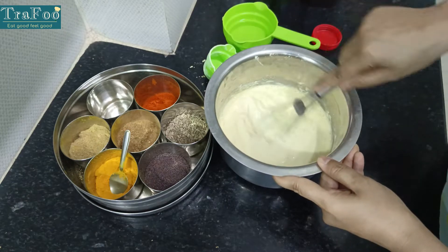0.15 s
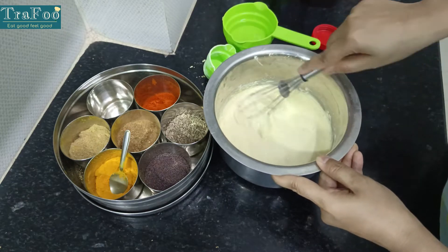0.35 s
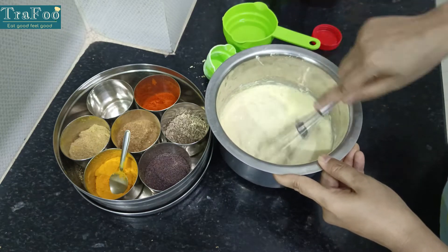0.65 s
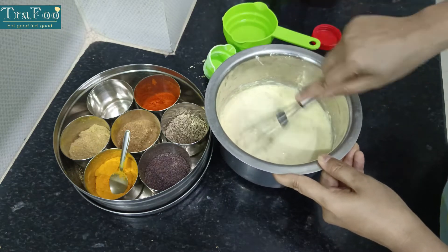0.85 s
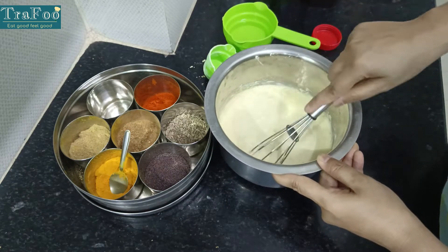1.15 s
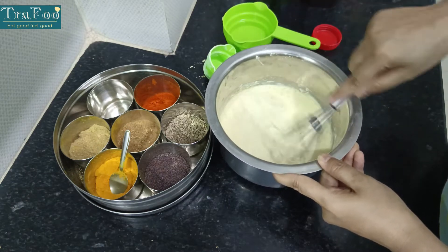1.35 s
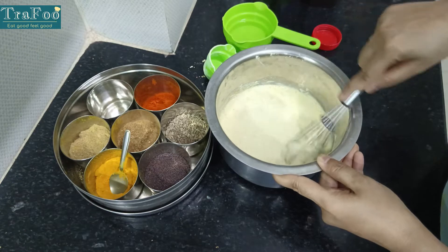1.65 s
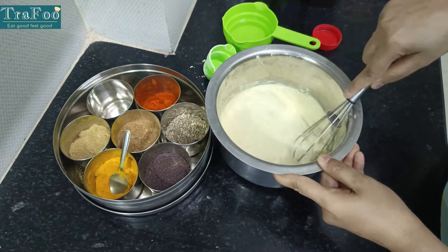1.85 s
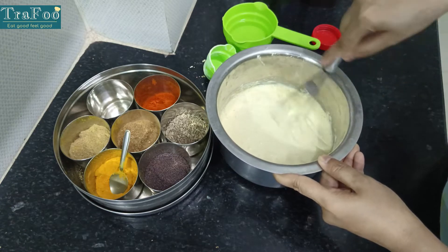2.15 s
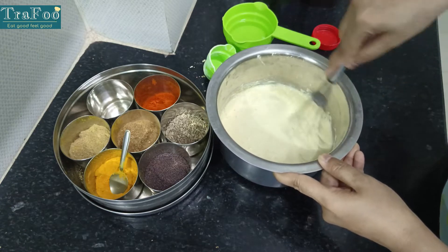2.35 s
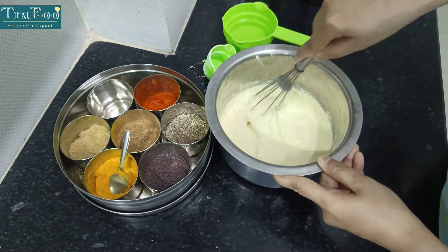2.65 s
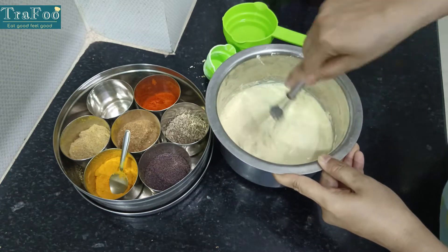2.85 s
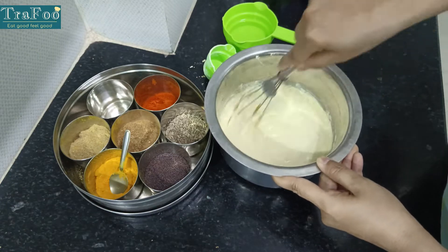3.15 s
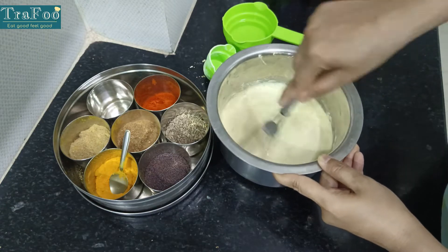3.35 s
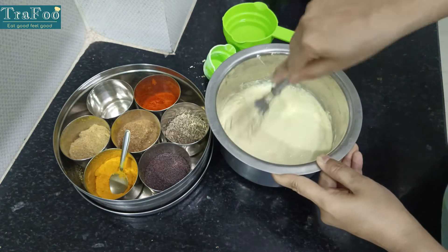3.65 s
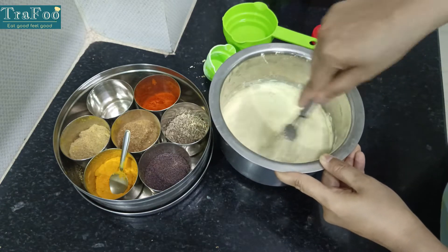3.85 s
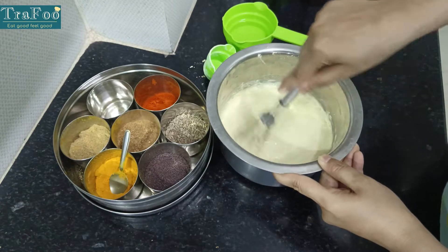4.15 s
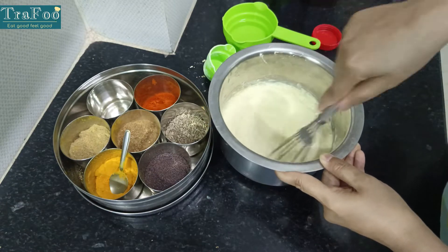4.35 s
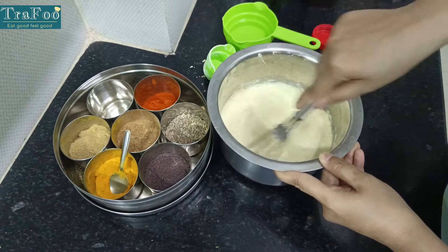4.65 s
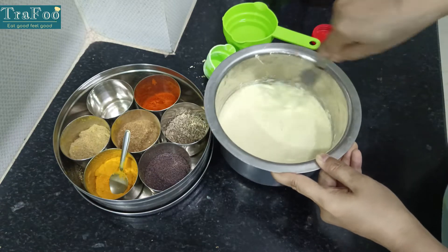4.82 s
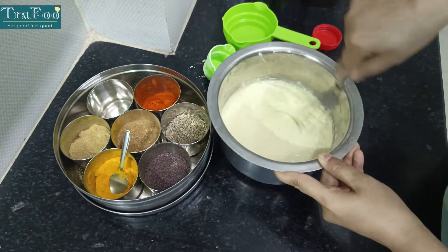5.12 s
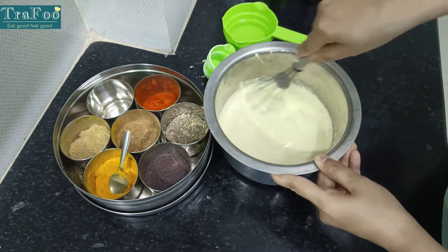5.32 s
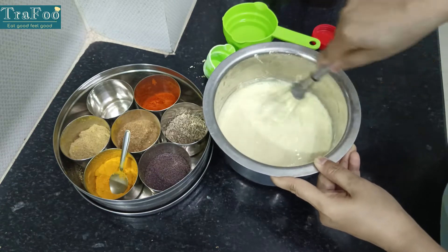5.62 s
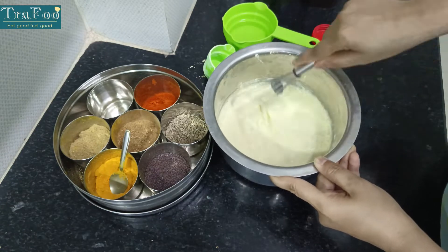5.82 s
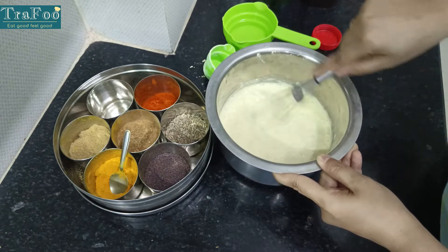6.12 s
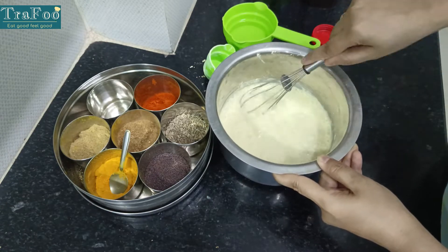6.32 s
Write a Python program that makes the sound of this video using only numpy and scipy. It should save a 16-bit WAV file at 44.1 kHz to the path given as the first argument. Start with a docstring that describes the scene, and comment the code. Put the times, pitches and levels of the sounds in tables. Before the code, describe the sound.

A wire whisk briskly beats batter in a steel bowl, wires scraping and clinking against the sides, with soft wet slops in a small kitchen.

```python
"""Whisk in a steel bowl

A wire whisk beats batter in a steel bowl on a stone counter, in a small hard-walled kitchen.
Wire slips, knocks and thuds strike decaying bowl modes; hard knocks leave the bare rim ringing.
Batter slops as short tones of rising pitch; jolts of noise make the counter hum low.
Two spaced microphones hear each mode out of step, with wall reflections and faint room tone."""
import sys
import numpy as np
from scipy import signal
from scipy.fft import rfft, irfft
from scipy.io import wavfile
from scipy.ndimage import uniform_filter1d

SR = 44100
rng = np.random.default_rng(int(sys.argv[2]) if len(sys.argv) > 2 else 0)


def waveform_to_disk(signal):
    """Save audio, clipped to [-1, 1], as 16-bit WAV at the path in sys.argv[1]."""
    frames = np.transpose(np.atleast_2d(signal))
    scaled = np.clip(frames, -1, 1) * 32767
    samples = np.round(scaled).astype(np.int16)
    wavfile.write(sys.argv[1], SR, samples)


N = 285768

# wires sweep the steel: hardest_press_s, level_db, swell_s, fade_s
STROKES = [(0.031, -39, 0.39, 0.052), (.14, -37.5, 0.088, 0.092), (.26, -40, 0.15, 0.074),
           (0.386, -33.5, 0.12, 0.075), (.5, -36.5, 0.057, 0.12), (.62, -37, 0.16, 0.085),
           (.75, -40.5, 0.12, 0.019), (.85, -32, 0.067, 0.044), (0.938, -33.5, 0.041, 0.038),
           (1.06, -36.5, 0.2, 0.12), (1.196, -39, 0.063, 0.039), (1.324, -37.5, 0.12, 0.055),
           (1.46, -43, 0.14, 0.02), (1.56, -36.5, 0.14, 0.089), (1.74, -38.5, 0.026, 0.14),
           (1.82, -37, 0.076, 0.01), (1.98, -43, 0.11, 0.085), (2.05, -35, 0.13, 0.022),
           (2.19, -39, 0.18, 0.15), (2.27, -38.5, 0.073, 0.02), (2.346, -38.5, 0.046, 0.02),
           (2.481, -35, 0.048, 0.082), (2.6, -41, 0.065, 0.15), (2.804, -31, 0.091, 0.09),
           (3.03, -36.5, 0.16, 0.26), (3.31, -34.5, 0.1, 0.068), (3.41, -41, 0.18, 0.26),
           (3.55, -40.5, 0.043, 0.34), (3.66, -47, 0.24, 0.036), (3.848, -35.5, 0.13, 0.14),
           (4.035, -40, 0.092, 0.17), (4.125, -35.5, 0.083, 0.06), (4.2, -40.5, 0.072, 0.032),
           (4.28, -39.5, 0.046, 0.18), (4.41, -35, 0.12, 0.093), (4.54, -40, 0.06, 0.17),
           (4.676, -36, 0.16, 0.066), (4.83, -37.5, 0.27, 0.3), (5.02, -44, .08, 0.043),
           (5.14, -39, 0.07, 0.26), (5.27, -40.5, 0.15, 0.059), (5.398, -41, 0.078, 0.022),
           (5.49, -36.5, 0.15, 0.11), (5.645, -38.5, 0.053, 0.11), (5.781, -37, 0.1, 0.064),
           (5.867, -34.5, 0.056, 0.11), (6.041, -36, 0.071, 0.007), (6.121, -35, 0.054, 0.094),
           (6.33, -38, 0.18, 0.1), (6.391, -35, 0.11, 0.054), (6.475, -35, 0.032, .05)]
# scrape while the hand turns; fall over one swell or fade length; its roundness (exponent)
TURN_DB, STROKE_DROP_DB, STROKE_ROUND = -72, 22.5, 1.3
SLIPS_PER_S = 3500
SKID_DB, SKID_S = -7, 0.0097   # loss of the skid into the batter; time constant of its power
# relative scrape spectrum: pitch_hz, density_db_per_hz
SCRAPE_SPECTRUM = [(300, -45), (1000, -50), (1200, -8), (1700, -5), (2600, -2.5), (3500, -1.5), (5000, 0.5),
                   (6200, -10), (8000, -13.5), (11000, -23), (16000, -45)]
# level of the lowest scrape, full below 1.2 kHz and gone by 1.5 kHz: time_s, level_db
LOW_SCRAPE = [(0, 6), (.25, -5), (.5, -5), (.7, -4), (.9, 5), (1.1, -2), (1.35, 3), (1.65, -6), (1.9, 4),
              (2.3, 7), (2.55, -7), (2.75, 11), (2.9, 4), (3.2, 8.5), (3.6, 12), (3.85, 8.5), (4.1, 6),
              (4.35, -4), (4.45, 7), (4.6, 0), (4.8, 9), (5.05, -1), (5.4, 10), (5.6, -8), (5.8, -13),
              (6.05, -1), (6.25, -9), (6.48, 10)]
# extra scrape tilt as the wires run deeper or shallower in the batter: time_s, tilt_db_per_octave
BRIGHTNESS = [(0, 0), (.2, 1), (.4, 1), (.6, 0.5), (.8, -1.5), (1.0, -1.5), (1.2, -1), (1.4, 0), (1.6, -1),
              (1.8, -1), (2.0, -1.5), (2.3, 1), (2.6, -0.5), (2.9, -1), (3.2, -1), (3.5, 0), (3.7, -1),
              (4.0, -2), (4.2, -1.5), (4.4, -2), (4.7, -0.5), (5.0, 2), (5.2, -2.5), (5.4, -1.5),
              (5.6, -1.5), (5.8, 0), (6.0, -0.5), (6.2, 0.5), (6.48, 0)]
# tilt per octave at a -36 dB press; a harder press sinks into the batter and dulls (dB/octave per dB)
BRIGHT_DB, DULLING = -2.5, 0.12
EDGE_FOLLOWS, EDGE_HZ = 0.29, 6100   # a harder press adds sizzle above this (dB per dB per octave)
AIR_FOLLOWS, AIR_HZ = 0.95, 9200   # the very top comes only with a firm press (dB per dB per octave)
WANDER_PER_S, NEIGHBOURS_ALIKE = 18.0, 0.45   # pace of the scraped spot; correlation of adjacent modes
# single wires flick the steel: mean rate, level over the scrape, width of the modes each one reaches
TICKS_PER_S, TICK_DB, TICK_WIDTH_OCT = 45, -14, 0.14
# three wires sing on the steel: boost, width, and scale of their random pitch drift
STREAK_DB, STREAK_WIDTH_OCT, STREAK_RANGE_OCT = 8, 0.067, 0.557

# wires knock the wall: start_s, peak_db, following_skid_db,
# then the colour against the peak: at_1400_hz_db, at_2400_hz_db, at_3400_hz_db, at_4500_hz_db,
# at_6000_hz_db, at_10000_hz_db; last ring_freedom_db for the clear modes
TAPS = [(0.091, -31.5, -41, -11.5, -17, -15, -10, -34, -35, 4),
        (0.201, -31.5, -38, -16, -10, -7, -8, -20, -35, -3),
        (0.2804, -29, -38, -10.5, -2, -35, -21, -18, -26, 0),
        (0.4654, -29.5, -29.5, -11, -34, -9, -11, -12, -36, -10),
        (0.5259, -14, -18, -30, -24, -21, 0.5, -14.5, -19, 5),
        (0.587, -23, -39, -22, -30, -12.5, -14, -19, -32, -2.5),
        (0.629, -29, -38, -23, -34, -17, -3, -32, -37, -2),
        (0.7207, -25.5, -27, -4.5, -12.5, -12, -16, -26, -46, 3.5),
        (0.9298, -28, -37, -13, -28, -6, -11, -14, -43, -4),
        (0.9738, -11.5, -17, -18.5, -5, -32, -3, -9, -21.5, 1),
        (1.32, -29, -41, -9.5, -36, 1, -34, -29, -34, 3),
        (1.4233, -22.5, -28.5, -9, -4.5, -16, -13, -30, -36, -9),
        (1.5534, -23, -34, -31, -25, -8, -13, -18, -35, 2), (1.615, -37, -46, 4, -9, -25, -25, -28, -45, 0),
        (1.6659, -22.5, -29.5, -3, -10, -10, -17, -18, -53, -5.5),
        (1.89, -24, -26.5, -7.5, -7, -16, -22, -17, -54, -10),
        (2.0888, -40, -49, 5.5, -14, -22, -21, -32, -46, -3),
        (2.152, -20, -27, -15, -7, -24, -6, -13.5, -18, 0.5),
        (2.195, -34, -47, -10, -2, -21, -25, -28, -36, -3),
        (2.2668, -27.5, -35, -14, -12, -4.5, -7, -28, -41, 0),
        (2.3336, -33.5, -29.5, -26, -14, 0, -6, -17, -38, 2),
        (2.3656, -15.5, -20.5, -54, -4, -36, -9, -12.5, -18, 5),
        (2.381, -21.5, -38, -31, -7, -22, -2, -10, -18, 4),
        (2.453, -31, -45, -2.5, -6, -20, -25, -28, -40, -6),
        (2.49, -33, -42, -25, -12, -3, -20, -23, -35, -6),
        (2.5045, -17.5, -23, -14.5, -2.5, -4.5, -11.5, -14, -26, -8.5),
        (2.5605, -32, -42, 3, -13, -22, -14, -18, -33, -4),
        (2.5792, -24, -42, -33, 0, -17, -11, -14, -27, -14),
        (2.608, -22.5, -25.5, -16, -17, -24, -3.5, -15, -26, 0.5),
        (2.7067, -22, -23, -7, -10.5, -5.5, -31, -16, -46, -20),
        (2.8422, -16, -25, -14.5, -15.5, -31, -3, -11.5, -25, 2),
        (2.8712, -33.5, -34, 2, -3, -24, -9, -28, -22, -2),
        (2.9644, -24.5, -30, -9, -15, -7, -8, -14.5, -31, 1.5),
        (3.0343, -28.5, -41, 4, -28, -10, -24, -28, -27, -7),
        (3.0989, -18.5, -26, -22, -11.5, -18, -2, -11.5, -22, -4),
        (3.2356, -22, -27, -2.5, -21, -8.5, -14, -18, -58, 2.5),
        (3.4292, -11.5, -17.5, -24, -19, -21, -1, -15, -16, -7.5),
        (3.4905, -21.5, -32.5, -4.5, -13, -19, -28, -26, -28, -2),
        (3.6584, -34, -44, -0.5, -2, -4, -23, -19, -48, -21),
        (3.7687, -15, -24, -10, -6, -13, -13, -30, -34, -4),
        (3.8, -34, -37, -25, -24.5, -5, -10, -25, -35, -7),
        (3.997, -27.5, -31, -2, -11.5, -16, -22, -32, -43, -4),
        (4.107, -29.5, -41, -12, -21, -0.5, -41, -17, -24, -6),
        (4.211, -27, -36, -10, -17, -4, -5, -21, -20, -17),
        (4.2563, -32, -31.5, -7, -11, -20, -24, -28, -30, 2),
        (4.4634, -11, -16, -11.5, -13, -23, -3, -17.5, -21, -0.5),
        (4.4833, -14.5, -30, -41, -21, -31, -0.5, -18, -23, -9),
        (4.52, -25, -42, -31, -3, -20, -8, -15, -27, -3),
        (4.7574, -9.5, -20, -6.5, -7, -23, -7, -18.5, -22.5, -7),
        (4.7785, -17, -19.5, -45, -9, -29, 0, -9, -19, 4),
        (4.86, -33, -45, -25, -25, -5, -10, -25, -37, -4),
        (4.9208, -11, -25, -9, -6, -18, -12.5, -11.5, -25, -7),
        (4.9657, -14.5, -22.5, -7, -3.5, -26, -2, -12.5, -21, -5.5),
        (5.1, -21, -28.5, -9.5, -16.5, -5, -29, -28, -36, -7),
        (5.2026, -21.5, -26, -2.5, -5.5, -35, -5, -13, -30, -10),
        (5.357, -20, -24, -6.5, -16, -8, -19, -32, -46, -3.5),
        (5.5366, -18.5, -21, -18, -21, -13, -6, -18, -21, 0),
        (5.6072, -30.5, -25.5, -9.5, -11, -16, -25, -32, -42, 5),
        (5.6215, -22, -26, -22, -24, -7, -16, -21, -41, -1),
        (5.7832, -34, -36, -7, -26, -1, -10, -22, -25, 2),
        (5.877, -32, -42, -40, -25, 1, -8, -16, -32, -15),
        (5.901, -30, -27, -33, -26, -0.5, -8, -17, -25, -3),
        (5.9333, -34, -42, 0, 0, -18, -23, -29, -36, -4),
        (6.0062, -21.5, -28.5, -8, -10, -11, -13, -23, -55, -4.5),
        (6.0856, -33, -42, -13, -13, -16, -4, -35, -45, 5),
        (6.114, -27.5, -46, -35, -18, 1, -13, -13, -18, -2.5),
        (6.244, -18.5, -24, -3, -4, -11, -15, -30, -52, -8.5),
        (6.292, -27, -40, -9, -23, -17, -5, -27, -41, 2),
        (6.4672, -25, -33, -13, -8, -7, -39, -21, -34, -4)]
# where the knock colours apply: pitch_hz (the last one repeats the 10 kHz colour)
KNOCK_HZ = [1400, 2400, 3400, 4500, 6000, 10000, 16000]
# the whisk's weight thuds through the batter into the low modes:
# start_s, peak_db, then relative to it deep_db, middle_db, upper_db
THUDS = [(0.286, -50, -30, -39, 4.5), (0.524, -37.5, -9, -14, 3), (0.558, -43.5, -9, -15, 2.5),
         (.722, -51.5, -32, -2, -20), (0.752, -58, -21, -6, -1), (0.978, -33, -11, -19, 3.5),
         (1.425, -57, -27, -1, -4), (1.667, -39.5, -11, -19.5, -2.5), (1.825, -46, -18, -21, -10),
         (1.887, -52, -34, -8, 3), (2.15, -26.5, 12, -23, -1), (2.2, -36, -3, -9, -17),
         (2.26, -53, -20, -3, 3), (2.365, -30.5, 13.5, -33, -3.5), (2.419, -49, -9, -17, -16),
         (2.459, -48, -16, -13, -7), (2.503, -30, -35, -13.5, 2.5), (2.56, -43, -4, -13, -6),
         (2.581, -31, 2, -27, -19), (2.612, -40, 3, -22, -3), (2.706, -57, -23, -9, -8),
         (2.842, -44, -13, 0, -1.5), (2.97, -46.5, -31, -26, 7.5), (3.048, -41, -29, -30, 7.5),
         (3.085, -32, 3, -10, -2.5), (3.238, -53, -43, 5, -13), (3.309, -54, -36, -17, -2),
         (3.386, -53.5, -43, -25, 13.5), (3.432, -32.5, -6, -29, -3.5), (3.549, -53.5, -34, -21, 9),
         (3.763, -38, -51, -9, -3), (3.84, -47, -35, -20, -1), (4.059, -62, -25, -7, -11),
         (4.218, -52, -9, -11, -3), (4.468, -30.5, 6.5, -11, 2), (4.52, -32, 6, -28, -9),
         (4.596, -43.5, 14, -27, -28), (4.755, -27, -1, -18, -1), (4.8, -33, -7, -19, 1.5),
         (4.92, -31.5, 2, -17, -0.5), (4.965, -30.5, 19.5, -27, -3), (5.029, -51, -9, -1, -14),
         (5.097, -50.5, -28, 0, 3), (5.2, -43.5, -20, -3, 13.5), (5.235, -33, -2, -15, -7),
         (5.379, -69, -27, -4, -16), (5.538, -54, -6, -7, -21), (5.626, -58, -27, 4, -21),
         (6.01, -48.5, -21, -4, -10), (6.245, -46, -45, -9, 3), (6.299, -50, -33, -25, 3),
         (6.406, -56, -32, -26, 5)]
# where deep, middle and three times upper apply: pitch_hz
THUD_HZ = [400, 580, 800, 1000, 1150]
TAP_SPREAD_S, THUD_SPREAD_S = 0.0033, 0.012   # mean lateness of the further wires of one blow
STIFF_HZ = 1100

# clear modes of the bowl: pitch_hz, level_over_dense_modes_db, t60_s
BOWL = [(376, -32.5, 0.029), (399, -16.5, 0.038), (415, -23, 0.041), (550, -11, 0.067), (664, -16, 0.041),
        (830, -16, 0.074), (945, -11, 0.029), (467, -11, 0.056), (593.5, -9, 0.13), (690, -9.5, 0.061),
        (774, -12.5, 0.063), (900, -16, 0.053), (1020, -8, 0.069), (1150, -2, 0.056), (1315, 5.5, 0.11),
        (1464, 10, 0.032), (1554, 4, 0.046), (1751, 6, 0.062), (1970, -10, 0.021), (2250, -2.5, 0.081),
        (2384, 4, 0.065), (2526, 3, 0.028), (2660, 6.5, 0.073), (2728, 6, 0.052), (3270, 7.5, 0.021),
        (3500, 5.5, 0.044), (3655, 1, 0.071), (4225, -9.5, 0.076), (4420, -6, 0.038), (4430, -10.5, 0.032),
        (4700, -24.5, 0.027)]
DENSE_T60_S = 0.036   # batter-damped modes between them, at 3 kHz; a little shorter higher up
# modes of the bare rim above the batter, which ring on: pitch_hz, t60_s
RIM = [(1300, 0.12), (1440, 0.4), (1550, 0.1), (1830, 0.39), (2228, 0.29), (2405, 0.14), (2645, 0.076),
       (2733, 0.23), (4450, 0.16), (4515, 0.19), (4630, 0.083)]
# hard knocks that reach the rim: start_s, then level_db for each rim mode in turn
RIM_KNOCKS = [(0.5258, -63, -66, -60, -47, -59, -65, -51, -51, -27.5, -29, -54),
              (0.7217, -47, -55, -69, -49, -47, -50, -54, -61, -52, -55, -65),
              (0.9737, -58, -40, -62, -55, -40, -33, -41, -32.5, -26, -31.5, -34),
              (2.152, -60, -63, -62, -66, -49, -39, -45, -45, -49, -56, -48),
              (2.3664, -65, -55, -58, -61, -51, -41, -39, -52, -41, -45, -41),
              (2.381, -65, -58, -58, -63, -45, -31, -41, -40, -58, -54, -50),
              (2.5047, -61, -62, -61, -60, -57, -43, -44, -39, -49, -57, -46),
              (2.7072, -59, -54, -34, -59, -64, -50, -60, -63, -55, -55, -60),
              (2.843, -44, -48, -36, -58, -50, -48, -51, -51, -45, -51, -43),
              (2.964, -44, -49, -50, -57, -63, -63, -60, -51, -65, -59, -59),
              (3.0985, -55, -47, -54, -52, -55, -52, -44, -44, -41, -44, -35),
              (3.236, -40, -56, -44, -61, -63, -57, -59, -62, -58, -63, -61),
              (3.429, -70, -59, -58, -56, -54, -40, -54, -35.5, -44, -49, -59),
              (3.4903, -54, -48, -36, -63, -60, -66, -53, -52, -53, -65, -67),
              (3.77, -49, -43, -31, -63, -40, -56, -48, -55, -63, -62, -59),
              (4.4642, -46, -43, -53, -49, -58, -44, -28, -39, -33, -40, -42),
              (4.4845, -62, -56, -50, -59, -57, -41, -34, -38, -39, -40, -46),
              (4.7567, -44, -38, -45, -52, -38, -38, -38, -35, -32, -38, -35),
              (4.7781, -49, -55, -54, -58, -38, -44, -37, -44, -42, -45, -49),
              (4.923, -58, -55, -54, -55, -35, -39, -54, -62, -42, -49, -54),
              (4.9658, -42, -43, -45, -62, -45, -45, -48, -47, -56, -52, -48),
              (5.099, -62, -43, -32, -60, -64, -54, -45, -50, -49, -47, -46),
              (5.2025, -50, -52, -51, -46, -51, -51, -45, -57, -52, -52, -65),
              (5.3578, -57, -51, -37, -48, -64, -60, -56, -60, -47, -49, -47),
              (5.6072, -36.5, -54, -60, -41, -66, -60, -51, -37, -48, -61, -50),
              (6.0082, -53, -50, -48, -49, -47, -56, -55, -61, -54, -56, -66),
              (6.244, -45, -44, -54, -44, -51, -58, -39, -48, -58, -60, -64)]
RIM_SPLIT_HZ, RIM_TWIN_DB = 21.8, -13   # scale of each weaker twin's random detuning; its level
# tilt between the microphones: pitch_hz, left_over_right_db
LEFT_OVER_RIGHT = [(300, 15), (550, -4.5), (1650, -0.5), (4970, -1), (9000, -7.5), (12000, -6.5),
                   (16000, -34)]
# typical phase between a mode's arrivals at the two microphones: pitch_hz, phase_rad
PHASE_APART = [(300, 0.47), (700, 1.52), (2000, 1.365), (5000, 1.622), (16000, 1.1)]

# batter slops back into the hollow behind the whisk:
# start_s, relative_level_db, starting_pitch_hz, t60_s
SLOPS = [(0.528, -41.5, 428, 0.16), (.725, -55, 555, 0.32), (0.861, -61, 925, 0.17),
         (1.18, -45, 1026, 0.11), (1.425, -55.5, 554, 0.2), (1.68, -63, 725, 0.38), (1.82, -61, 717, .2),
         (2.155, -39, 380, 0.13), (2.365, -34, 368, 0.15), (2.44, -56, 920, .2), (2.58, -55, 373, 0.47),
         (2.72, -61, 584, 0.45), (2.8, -53.5, 810, .25), (2.84, -53, 389, 0.2), (2.965, -51.5, 880, 0.38),
         (3.083, -46, 388, 0.34), (3.239, -54, 950, 0.2), (3.299, -52, 945, 0.3), (3.388, -42, 988, 0.16),
         (3.43, -52, 455, 0.3), (3.52, -64, 610, 0.31), (3.76, -28, 711, 0.083), (3.84, -52, 682, 0.19),
         (4.01, -54, 960, 0.56), (4.06, -53, 580, 0.1), (4.09, -46, 980, 0.1), (4.21, -68, 569, 0.97),
         (4.299, -63, 910, 0.36), (4.36, -71.5, 316, 0.65), (4.601, -55, 344, 0.36),
         (4.964, -40.5, 367, 0.18), (5.229, -37, 377, 0.089), (5.38, -63, 546, 0.37),
         (5.41, -49, 940, 0.13), (5.541, -52.5, 463, 0.1), (5.62, -53, 520, 0.1), (6.01, -52.5, 535, 0.19),
         (6.25, -46, 564, 0.15)]
SLOP_RISE_OCT_PER_S, SLOP_ATTACK_S = 3.26, 0.02
SLOP_WOBBLE_HZ, SLOP_ROUGH = 100, 1.5   # the hollow gulps unevenly: random points per second; depth
SLOP_LAG_S = 0.00025   # the slop reaches the right microphone later
# random small gulps: rate, top relative level at a -48 dB jolt, decay, share of the jolts they follow
GULPS_PER_S, GULP_DB, GULP_T60_S, GULP_FOLLOWS = 22, -63.5, 0.15, 0.58

# the foot of the bowl jolts the counter: peak_s, level_db, fall_s
ROCKING = [(0.078, -68, 0.08), (0.768, -77, 0.072), (0.85, -73, 0.052), (1.06, -68, 0.052),
           (1.227, -65.5, 0.097), (1.315, -59, 0.095), (1.433, -66, 0.073), (1.62, -69.5, 0.22),
           (1.773, -51, 0.045), (1.933, -64, 0.075), (2.212, -56, .06), (2.374, -62, 0.2),
           (2.546, -45, 0.049), (2.626, -53, 0.12), (2.741, -44.5, 0.08), (2.888, -43.5, 0.04),
           (2.998, -52.5, 0.15), (3.137, -45, 0.095), (3.242, -44, 0.11), (3.274, -44, 0.046),
           (3.401, -52.5, 0.056), (3.524, -46.5, 0.055), (3.61, -62, 0.23), (3.811, -40, 0.067),
           (3.959, -53.5, 0.072), (4.039, -45.5, 0.061), (4.206, -46, 0.065), (4.295, -42.5, 0.14),
           (4.373, -45.5, 0.21), (4.512, -40, 0.095), (4.698, -56.5, 0.05), (4.799, -35, 0.066),
           (4.928, -45.5, 0.18), (5.006, -44.5, 0.038), (5.137, -45, 0.047), (5.234, -49.5, 0.11),
           (5.392, -42.5, 0.038), (5.607, -61, 0.32), (5.763, -56, 0.08), (5.932, -67.5, 0.31),
           (6.285, -58, 0.083)]
# level floor between jolts; fall over one length; rise length as a share of the fall length
REST_DB, JOLT_DROP_DB, JOLT_RISE = -79, 21, 0.74
# low resonances of the counter: pitch_hz, width_hz, level_db
COUNTER = [(101.8, 18.3, 1.36), (162.4, 17.6, 0.5), (239, 57, -56)]
# extra level of the upper counter modes at a -55 dB jolt; share of the swing that they follow
UPPER_DB, UPPER_FOLLOWS = -19, 0.49
# a jolt with more of the upper counter modes: peak_s, extra_db, length_s
UPPER_JOLTS = [(1.78, 16, 0.083)]

KITCHEN_T60_S, KITCHEN_DB, WALL_LOW_HZ, WALL_CUT_HZ = 0.38, -14, 445, 6600
# relative spectrum of the room tone: pitch_hz, density_db_per_hz
ROOM_TONE = [(15, -31), (25, -9), (55, -13), (98, -5), (240, -16), (500, -13.5), (870, -17), (2000, -30),
             (8000, -58), (16000, -64)]
ROOM_TONE_DB = -70
CUTOFF_HZ = 16200   # 70 dB down from here up


def from_db(db):
    """Gain of a level in dB."""
    return 10 ** (np.asarray(db) / 20)


def rms_one(x):
    """Scale to rms 1."""
    return x / np.sqrt(np.mean(x ** 2) + 1e-20)


def at_hz(points, hz):
    """Read a table of pitch and value on a log-frequency axis."""
    points = np.array(points)
    return np.interp(np.log(hz), np.log(points[:, 0]), points[:, 1])


def drift(rate):
    """Normal random points, this many a second, joined by straight lines."""
    steps = rng.standard_normal(4000)
    return np.interp(np.arange(N) / SR * rate, np.arange(len(steps)), steps)


def shaped(x, spectrum):
    """Give a signal a spectrum."""
    hz = np.maximum(np.fft.rfftfreq(x.shape[-1], 1 / SR), 1)
    return irfft(rfft(x) * from_db(at_hz(spectrum, hz)), x.shape[-1])


def swells(s, peak_db, rise_s, fall_s, drop_db, roundness, rest_db):
    """Level in dB of overlapping swells, summed as power over a resting level."""
    t = np.arange(0, N / SR + .001, .001)[:, None] - s   # 1 ms grid
    away = np.where(t < 0, -t / np.abs(rise_s), t / np.abs(fall_s))
    swell_db = peak_db - drop_db * np.minimum(away, 9) ** roundness
    power = from_db(2 * swell_db).sum(axis=1) + from_db(2 * rest_db)
    return np.interp(np.arange(N) / SR * 1000, np.arange(len(t)), 10 * np.log10(power))


def decay_per_sample(t60):
    """Factor that takes a ring down 60 dB in t60 seconds."""
    return from_db(-60 / (t60 * SR))


def resonate(force, hz, t60):
    """One mode of the steel: a two-pole resonator rings at its pitch and dies away."""
    r, w = decay_per_sample(t60), 2 * np.pi * hz / SR
    return signal.lfilter([0, np.sin(w)], [1, -2 * r * np.cos(w), r * r], force)


def add_to_microphones(out, sound, hz, phase_scale=1.0):
    """A mode reaches one microphone, picked at random, before the other; its pitch sets the balance."""
    w = 2 * np.pi * hz / SR
    first = rng.integers(2)
    lag = max(1, round(at_hz(PHASE_APART, hz) * phase_scale / w))
    lean = from_db(at_hz(LEFT_OVER_RIGHT, hz) / 2)
    gains = [lean, 1 / lean]
    out[first] += gains[first] * sound
    out[1 - first, lag:] += gains[1 - first] * sound[:N - lag]


def bowl():
    """Slips and blows strike every mode; each mode reaches the two microphones by its own path."""
    modes = all_modes(count=84)
    knock_db, thud_db = blow_colours()
    knocks = contacts(TAPS, TAP_SPREAD_S, count=16, fade_db=-7.0, first_db=-2.5), knock_db, KNOCK_HZ
    thuds = contacts(THUDS, THUD_SPREAD_S, count=12, fade_db=-0.5, first_db=2.5), thud_db, THUD_HZ
    out = np.zeros((2, 2, N))   # low and high range, left and right
    for k, force in scrape_forces(modes):
        hz, level_db, t60 = modes[k]
        high = int(hz > STIFF_HZ)
        (at, size), colours, colour_hz = knocks if high else thuds
        blow_db = np.array([np.interp(np.log(hz), np.log(colour_hz), c) for c in colours]) + level_db
        if high and k < len(BOWL):   # wires that stay on the steel choke the ring
            blow_db = blow_db + np.array(TAPS)[:, 9]
        blow_db = blow_db + rng.normal(0, 2.84, len(at))   # every blow lands on another spot
        np.add.at(force, at, size * rng.choice([-1, 1], at.shape) * from_db(blow_db)[:, None])
        sound = resonate(force, hz, t60)
        add_to_microphones(out[high], sound, hz, phase_scale=rng.uniform(0.77, 1.176))
    # a small bowl radiates poorly below its modes
    low_band = signal.butter(3, [290, 1150], "band", fs=SR, output="sos")
    high_band = signal.cheby1(8, .5, 1150, "high", fs=SR, output="sos")
    return signal.sosfilt(low_band, out[0]) + signal.sosfilt(high_band, out[1])


def all_modes(count):
    """Clear modes plus dense damped ones above the bowl's stiff low range."""
    hz = np.geomspace(1110, 15800, count)
    dense = np.column_stack([hz, 0 * hz, DENSE_T60_S * (3000 / hz) ** 0.2])
    return np.vstack([BOWL, dense])


def scrape_forces(modes):
    """Yield mode index and slip force in pitch order; place, press and single wires colour the slips."""
    slip_at, slip_size, press_db = scrape_slips(SLIPS_PER_S, size_db=3.2)
    slip_s = slip_at / SR
    bright_db = BRIGHT_DB - DULLING * press_db + np.interp(slip_s, *np.transpose(BRIGHTNESS))
    low_db = np.interp(slip_s, *np.transpose(LOW_SCRAPE))
    # each mode's share of the scrape power
    share_db = at_hz(SCRAPE_SPECTRUM, modes[:, 0]) + 10 * np.log10(modes[:, 0]) + modes[:, 1]
    share_db[:len(BOWL)] -= 3.2   # wires resting on the steel choke the clear modes
    share_db -= 10 * np.log10(np.sum(from_db(2 * share_db)))
    ticks = np.flatnonzero(rng.random(len(slip_at)) < TICKS_PER_S / SLIPS_PER_S)
    tick_hz = 1200 * 2 ** rng.uniform(0, 2.3, len(ticks))
    streak_hz = [hz * 2 ** (STREAK_RANGE_OCT * drift(rate=7)[slip_at]) for hz in (1500, 2500, 4000)]
    wander = rng.standard_normal(int(N / SR * WANDER_PER_S) + 2)
    for k in np.argsort(modes[:, 0]):
        hz, _, t60 = modes[k]
        # the wires travel across the bowl, so groups of neighbouring modes swell and fade
        fresh = rng.standard_normal(len(wander))
        wander = NEIGHBOURS_ALIKE * wander + np.sqrt(1 - NEIGHBOURS_ALIKE ** 2) * fresh
        spot = np.interp(slip_s * WANDER_PER_S, np.arange(len(wander)), wander)
        place_db = -4.5 + 3.47 * (2000 / hz) ** 0.09 * spot
        for line_hz in streak_hz:
            place_db = place_db + STREAK_DB * np.exp(-(np.log2(hz / line_hz) / STREAK_WIDTH_OCT) ** 2)
        sizzle_db = EDGE_FOLLOWS * np.maximum(press_db, -25) * max(np.log2(hz / EDGE_HZ), 0)
        air_db = AIR_FOLLOWS * np.clip(press_db, -25, 0) * max(np.log2(hz / AIR_HZ), 0)
        lowest_db = low_db * np.clip(np.log(1500 / hz) / 0.23, 0, 1)
        tilt_db = bright_db * np.log2(hz / 2500)
        slip_db = share_db[k] + tilt_db + place_db + sizzle_db + air_db + lowest_db
        # a long ring gathers more slips, so even out its power
        slip_gain = from_db(slip_db) * np.sqrt(2 * (1 - decay_per_sample(t60) ** 2))
        force = np.full(N, 1e-18)
        force[slip_at] = slip_size * slip_gain * rng.standard_normal(len(slip_at))
        off_pitch_db = 10 * (np.log2(hz / tick_hz) / TICK_WIDTH_OCT) ** 2
        tick_gain = from_db(TICK_DB + at_hz(SCRAPE_SPECTRUM, hz) - off_pitch_db)
        force[slip_at[ticks]] += slip_size[ticks] * tick_gain * rng.standard_normal(len(ticks))
        yield k, force


def scrape_slips(per_s, size_db):
    """Tiny slips of the wires on steel: sample, strength and press (dB over -36 dB) of each."""
    level_db = swells(*np.transpose(STROKES), STROKE_DROP_DB, STROKE_ROUND, TURN_DB)
    press_db = level_db + 36
    # after a tap the wires skid on, pressed hard at first
    rows = np.array(TAPS)
    taps = np.zeros(N)
    taps[(rows[:, 0] * SR).astype(int)] = from_db(2 * (rows[:, 2] + SKID_DB))
    skid_power = signal.lfilter([1], [1, -np.exp(-1 / (SKID_S * SR))], taps)
    level_db = 10 * np.log10(from_db(2 * level_db) + skid_power)
    at = np.flatnonzero(rng.random(N) < per_s / SR)
    size = from_db(size_db * np.minimum(rng.exponential(1, len(at)), 4))
    size = size / np.sqrt(np.mean(size ** 2) * per_s / SR)
    chatter_db = 1.35 * drift(45)   # pressure jumps as wire after wire takes the load
    return at, size * from_db((level_db + chatter_db)[at]), press_db[at]


def contacts(rows, spread_s, count, fade_db, first_db):
    """Several wires land within each blow; the first has its own level, later ones weaken with delay."""
    late = rng.exponential(1, (len(rows), count))
    late[:, 0] = 0
    at = ((np.array(rows)[:, :1] + late * spread_s) * SR).astype(int)
    return np.minimum(at, N - 1), from_db(fade_db * late + first_db * (late == 0)) / np.sqrt(count)


def blow_colours():
    """Level in dB that each knock and each thud gives at its reference pitches."""
    taps = np.array(TAPS)
    per_mode_db = [-12.0, -8.0, -6.5, -2.5, -5.5, -9.5, -31.0]   # level offset at each knock pitch
    knock = taps[:, 1:2] + taps[:, [3, 4, 5, 6, 7, 8, 8]] + per_mode_db
    _, peak, deep, middle, upper = np.transpose(THUDS)
    colour = np.column_stack([deep + 0.12, middle + 7.1, upper + 2.6, upper + 1.7, upper + 3.0])
    return knock, peak[:, None] + colour


def rim():
    """Hard knocks set the rim ringing; each mode beats with a twin, out of step at the microphones."""
    rows, out = np.array(RIM_KNOCKS), np.zeros((2, N))
    late_s = rng.uniform(.001, .004, (len(rows), 2 * len(RIM)))
    for k, (mode_hz, t60) in enumerate(RIM):
        for twin in range(2):
            ring_hz = mode_hz + twin * RIM_SPLIT_HZ * rng.uniform(-1.39, 1.13)
            at = ((rows[:, 0] + late_s[:, 2 * k + twin]) * SR).astype(int)
            force = np.full(N, 1e-18)
            force[at] = from_db(rows[:, 1 + k] + twin * RIM_TWIN_DB)
            add_to_microphones(out, resonate(force, ring_hz, t60), mode_hz)
    return signal.sosfilt(signal.butter(6, STIFF_HZ, "high", fs=SR, output="sos"), out)


def slops():
    """The closing hollow rings unevenly, its pitch climbing as it shrinks."""
    out, t = np.zeros(N + SR), np.arange(int(.2 * SR)) / SR
    for s, level_db, hz, t60 in np.vstack([SLOPS, gulps()]):
        steps = rng.standard_normal((2, 40))
        wobble = [np.interp(t * SLOP_WOBBLE_HZ, np.arange(40), step) for step in steps]
        phase = 2 * np.pi * np.cumsum(hz * 2 ** (SLOP_RISE_OCT_PER_S * t)) / SR
        steady = (1 + SLOP_ROUGH * wobble[0]) * np.sin(phase)
        tone = steady + SLOP_ROUGH * wobble[1] * np.cos(phase)
        attack = 1 - np.exp(-t / SLOP_ATTACK_S)
        end_fade = np.cos(np.pi / 2 * t / t[-1])
        start = int(s * SR)
        out[start:start + len(t)] += attack * from_db(level_db - 60 * t / t60) * end_fade * tone
    late = np.pad(out, (int(SLOP_LAG_S * SR), 0))
    # the left side is slightly louder than the right
    return np.array([out[:N], late[:N]]) * from_db([[0.6], [-0.6]])


def gulps():
    """Rows like the slops, at random moments and pitches, louder while the bowl rocks."""
    draw = rng.random((int(GULPS_PER_S * N / SR), 3))
    s = draw[:, 0] * N / SR
    effort_db = GULP_FOLLOWS * (np.interp(s, *np.transpose(ROCKING)[:2]) + 48)
    level_db = GULP_DB + effort_db - 8.4 * draw[:, 1]
    return np.column_stack([s, level_db, 330 * 2 ** (1.7 * draw[:, 2]), GULP_T60_S + 0 * s])


def counter():
    """Uneven pushes of the bowl's foot excite the low resonances of the counter."""
    s, jolt_db, length = np.transpose(ROCKING)
    level_db = swells(s, jolt_db, JOLT_RISE * length, length, JOLT_DROP_DB, roundness=1.32, rest_db=REST_DB)
    upper_db = UPPER_DB - (1 - UPPER_FOLLOWS) * (level_db + 55)
    s, extra_db, length = np.transpose(UPPER_JOLTS)
    upper_db = upper_db + swells(s, extra_db, length, length, JOLT_DROP_DB, roundness=1.5, rest_db=0.5)
    mid, side = rng.standard_normal((2, N))
    push = mid + 0.13 * side * [[1], [-1]]
    hum = 0
    for k, (hz, width_hz, mode_db) in enumerate(COUNTER):
        r = np.exp(-np.pi * width_hz / SR)
        a = [1, -2 * r * np.cos(2 * np.pi * hz / SR), r * r]
        ring = rms_one(signal.lfilter([1, 0, -1], a, signal.lfilter([1, 0, -1], a, push)))
        # partly even out the random swings of the noise-driven hum
        swell = uniform_filter1d(ring[0] ** 2, size=1300)
        ring = rms_one(ring / (swell + 0.25) ** 0.5)
        hum = hum + from_db(mode_db + (k > 0) * (upper_db + 5.4 * drift(rate=39))) * ring
    hum = hum * from_db(level_db) * from_db([[-1.0], [1.0]])
    # the slab does not move below its first mode
    return signal.sosfilt(signal.butter(2, 62.0, "high", fs=SR, output="sos"), hum)


def kitchen(x):
    """Diffuse tail from the walls: decaying band-limited noise, its own in each channel."""
    t = np.arange(int(.5 * SR)) / SR
    onset = np.clip((t - .003) / 0.0029, 0, 1)
    tail = rng.standard_normal((2, len(t))) * from_db(-60 * t / KITCHEN_T60_S) * onset
    tail = signal.lfilter(*signal.butter(2, [WALL_LOW_HZ, WALL_CUT_HZ], "band", fs=SR), tail)
    tail = tail / np.sqrt(np.sum(tail ** 2, axis=1, keepdims=True))
    return from_db(KITCHEN_DB) * signal.fftconvolve(x, tail, axes=1)[:, :N]


def room_tone():
    """Faint noise, partly alike in both channels; each range of pitch wavers on its own."""
    mid, side = rng.standard_normal((2, N))
    tone = rms_one(shaped(mid + 0.63 * side * [[1], [-1]], ROOM_TONE))
    out, edges = 0, [10, 140, 260, 420, 620, 850, 1150, 19000]
    for low, high in zip(edges, edges[1:]):
        band = signal.sosfilt(signal.butter(2, [low, high], "band", fs=SR, output="sos"), tone)
        out = out + from_db(ROOM_TONE_DB + 5.0 * drift(rate=14)) * band
    return out


def scene():
    """Bowl, rim and batter in the kitchen, over counter hum and room tone."""
    steel = bowl() + rim() + slops()
    return steel + kitchen(steel) + counter() + room_tone()


def record(dry):
    """The top is cut."""
    return signal.sosfilt(signal.cheby2(16, 70, CUTOFF_HZ, fs=SR, output="sos"), dry)


dry = scene()
out = record(dry)
waveform_to_disk(out)
```